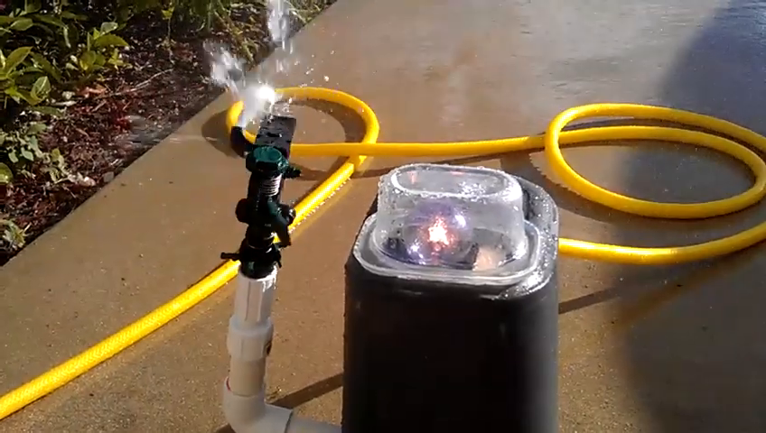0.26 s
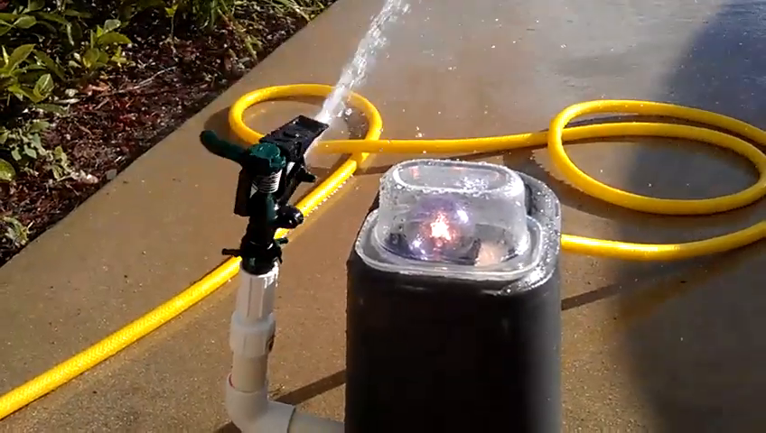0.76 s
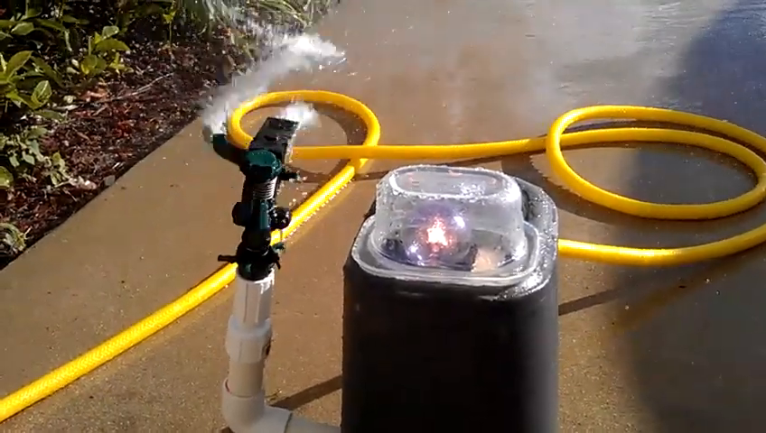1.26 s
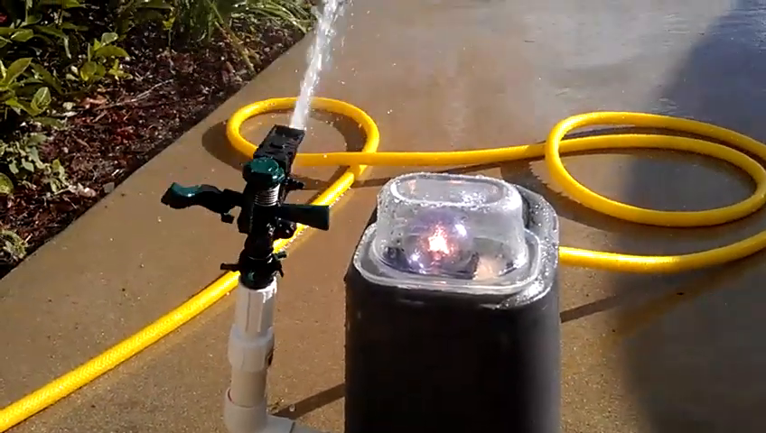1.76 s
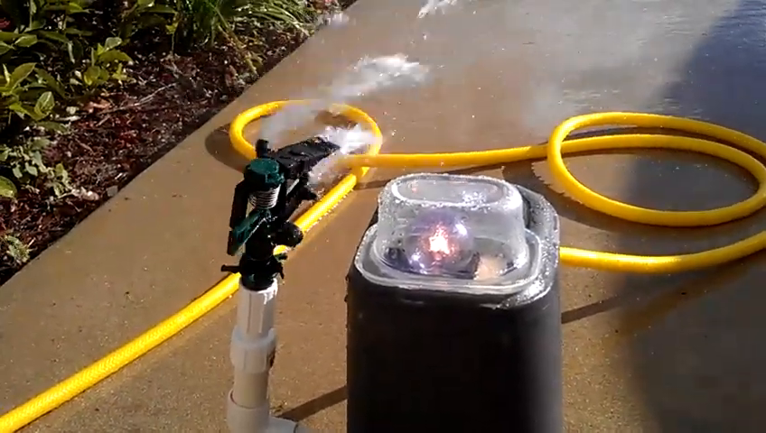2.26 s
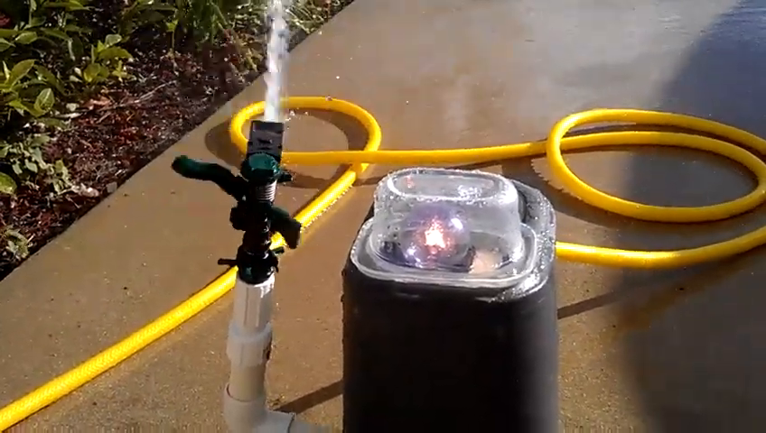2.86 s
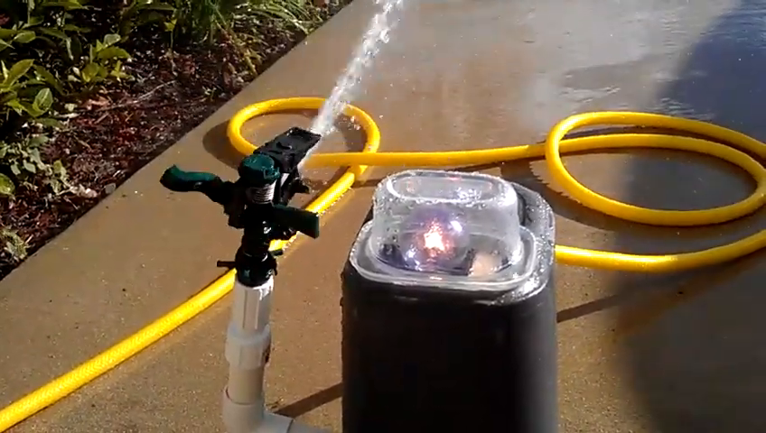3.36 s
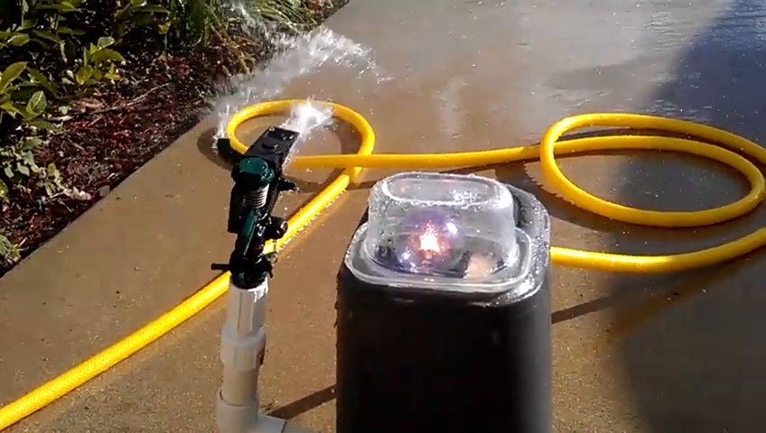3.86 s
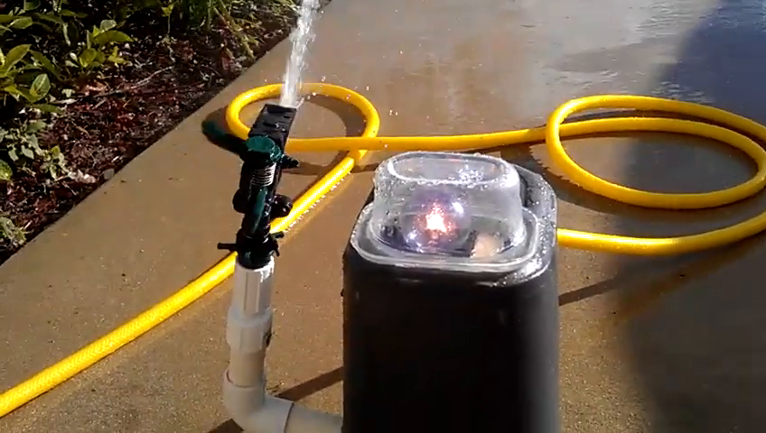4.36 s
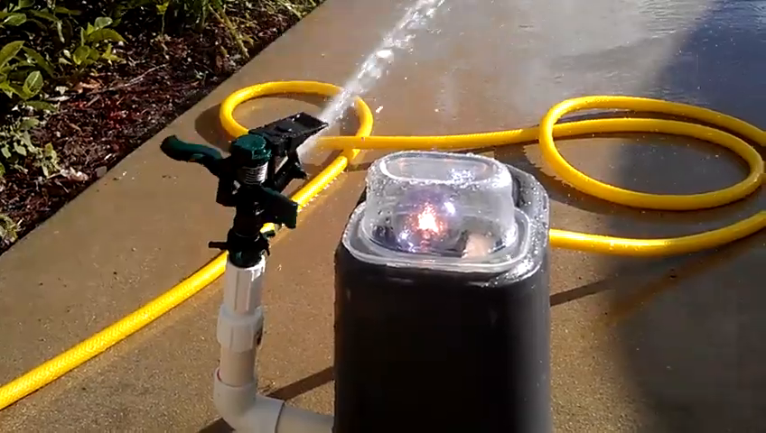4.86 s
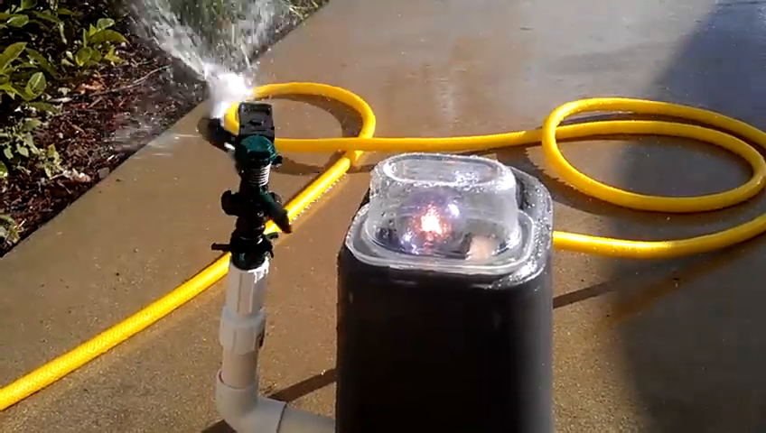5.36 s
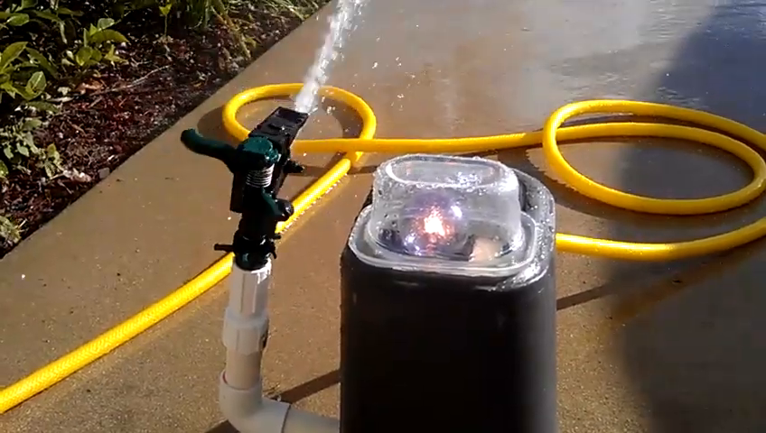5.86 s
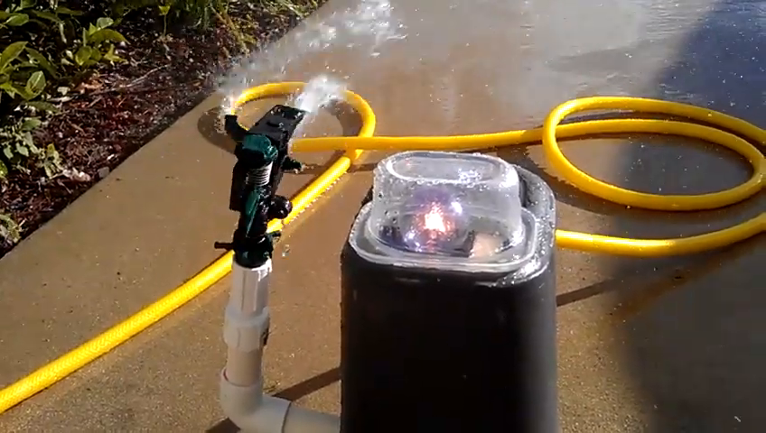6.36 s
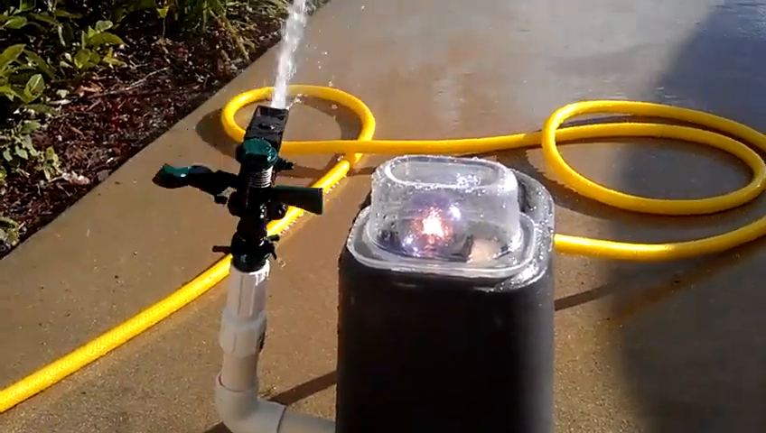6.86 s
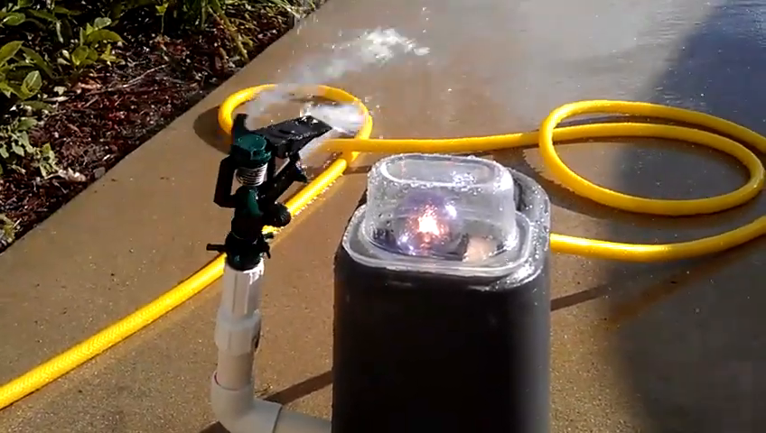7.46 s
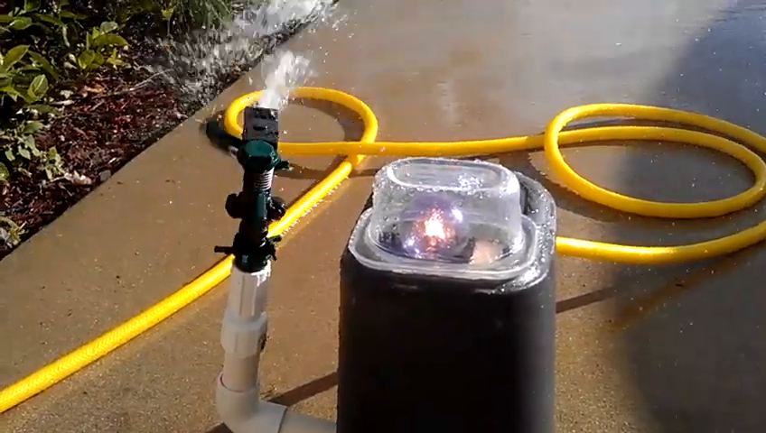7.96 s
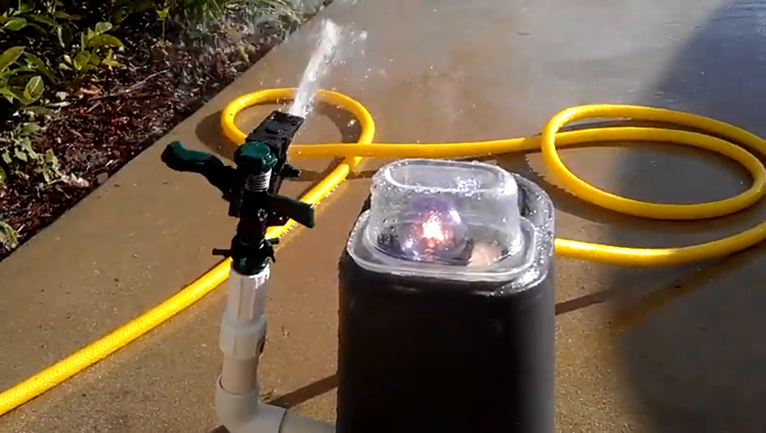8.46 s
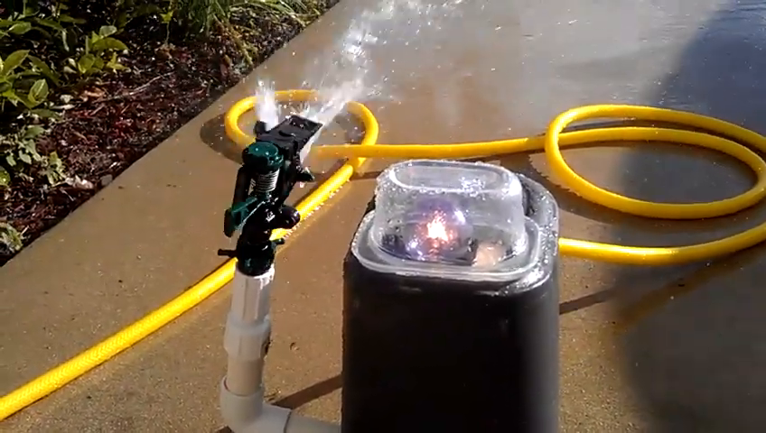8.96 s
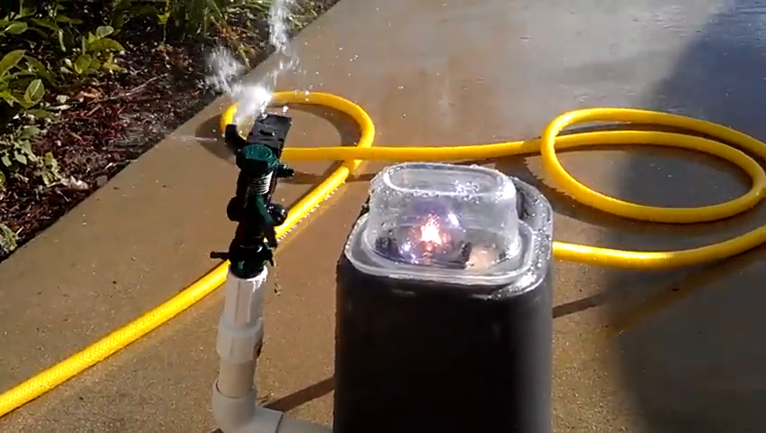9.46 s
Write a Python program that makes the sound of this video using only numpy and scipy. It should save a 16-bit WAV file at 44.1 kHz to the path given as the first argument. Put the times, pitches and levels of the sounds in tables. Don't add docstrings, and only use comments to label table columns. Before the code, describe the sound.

An impact sprinkler very close to a handheld stereo microphone outdoors. Its arm chops through the jet about nine times a second, each slap a hard splashy crack with a dry, hollow plastic knock. Every second or so the even run ends in a softer-edged, longer splash and a fast, buzzing flutter as the head swings back. Water hisses throughout, with light wind thumps, a few puddle plops and slightly overloaded peaks.

```python
import sys
import numpy as np
from scipy import signal
from scipy.fft import rfft, irfft
from scipy.io import wavfile
from scipy.ndimage import uniform_filter1d

SR = 44100
rng = np.random.default_rng(int(sys.argv[2]) if len(sys.argv) > 2 else 0)


def unload_wav(signal):
    wavfile.write(
        sys.argv[1],
        SR,
        np.round(np.clip(np.atleast_2d(signal).T, -1, 1) * 32767).astype(np.int16),
    )


def field_ratio(decibels):
    return 10 ** (np.asarray(decibels, dtype=float) / 20)


N = 428211
FREQ = np.maximum(np.fft.rfftfreq(N, 1 / SR), 1)
TIME = np.arange(N) / SR
SLAP_PERIOD_S, FLUTTER_PERIOD_S = .1064, .035
SWEEP_PAUSE_S = 2 * SLAP_PERIOD_S


def strokes(runs, period_s):
    rows = []
    for first, last, db in runs:
        count = round((last - first) / period_s) + 1
        rows += [(s, db) for s in np.linspace(first, last, count)]
    return np.transpose(rows)


# first slap in seconds, last slap in seconds, splash level in dB.
SLAP_RUNS = [(.221, .650, -6.5), (.748, 1.069, -7), (1.572, 1.892, -8), (1.997, 2.318, -6.5),
             (2.850, 3.702, -7), (4.228, 4.759, -7), (4.864, 4.864, -4.5), (4.972, 4.972, -7),
             (5.531, 5.636, -8.5), (5.737, 6.271, -6.5), (6.763, 7.614, -6.5), (8.174, 8.709, -7),
             (8.814, 8.814, -2.5), (8.921, 8.921, -6), (9.410, 9.622, -7.5)]
# first stroke in seconds, last stroke in seconds, splash level in dB.
FLUTTER_RUNS = [(.015, .120, -6), (1.110, 1.462, -5), (2.359, 2.745, -5.5), (3.744, 4.124, -6),
                (5.010, 5.423, -5.5), (6.308, 6.661, -6), (7.653, 8.077, -6.5), (8.961, 9.312, -6)]


def arm():
    s, db = strokes(SLAP_RUNS, SLAP_PERIOD_S)
    chance = rng.standard_normal((len(s), 3)).T
    first = np.diff(s, prepend=0) > SWEEP_PAUSE_S
    trip = np.diff(s, append=s[-1]) > SWEEP_PAUSE_S
    level_db = db + 0.8 * chance[0] + 2.3 * trip
    knock_db = -10.5 + 1.4 * chance[1] + 0.5 * first
    rise_ms = np.where(trip, 5.5, 2.3 * np.exp(.5 * chance[2]))
    rise_ms[first] = 1.1
    fall_ms = np.where(trip, 13, 10.3 * np.exp(.15 * chance[1]))
    slap = np.array([s, level_db, knock_db, rise_ms, fall_ms])

    s, db = strokes(FLUTTER_RUNS, FLUTTER_PERIOD_S)
    chance = rng.standard_normal((len(s), 3)).T
    jitter_s = 0.00119 * chance[2]
    quick = np.array([s + jitter_s, db + 0.88 * chance[0], -24 + 2.4 * chance[1]])
    return slap, quick


def along(table, hz):
    points = np.array(table)
    return np.interp(np.log(hz), np.log(points[:, 0]), points[:, 1])


def walk(rate):
    k = int(SR / rate)
    held = np.repeat(rng.standard_normal(N // k + 1), k)
    return 1.4 * uniform_filter1d(uniform_filter1d(held, k), k)[:N]


# frequency in Hz, share common to both ports from 0 to 1.
COHERENCE = [(60, 0.42), (300, 0.93), (1200, 0.63), (1700, 0.17), (2600, 0.77), (3300, 0.29), (5500, 0.17),
             (9700, 0.04), (10200, 0.04)]
# frequency in Hz, left minus right in dB.
BALANCE = [(60, 0), (400, 1), (1200, 2), (2700, 1), (3800, 1.5), (4600, 1.5), (5200, 2.5), (6500, 5),
           (7300, 0.5), (7700, 4.5), (8500, -8.5), (10000, 1), (13000, 1)]


def ports(common, own):
    share = np.clip(along(COHERENCE, FREQ), 0, 1)
    right_lag_s = 2.8 / SR
    lag = np.array([np.ones(len(FREQ)), np.exp(-2j * np.pi * FREQ * right_lag_s)])
    side = field_ratio(along(BALANCE, FREQ) * np.array([[.5], [-.5]]))
    return side * (np.sqrt(share) * common * lag + np.sqrt(1 - share) * own)


def water(tone, shape_db, sharpness, shared_db, own_db, flicker_hz):
    noise = rfft(rng.standard_normal((3, N)))
    spectrum = ports(noise[0], noise[1:]) * field_ratio(along(tone, FREQ))
    spectrum /= np.sqrt(2 * np.mean(np.sum(np.abs(spectrum) ** 2, axis=1))) / N
    edges = np.r_[0, 500 * 2 ** np.arange(0, 5.1, .5), SR]
    shared, out = walk(flicker_hz), 0
    for lo, hi in zip(edges, edges[1:]):
        sharp = np.interp(np.log(hi), np.log([1000, 8000, 14000]), sharpness)
        gain = field_ratio(sharp * shape_db + shared_db * shared + own_db * walk(flicker_hz / 3))
        band = (FREQ >= lo) & (FREQ < hi)
        out = out + gain * irfft(spectrum * band, N)
    return out


def bursts(times, levels_db, rise_ms, fall_ms, hold_ms):
    power = np.full(N + 8000, 1e-9)
    ms = np.arange(-2000, 4000) * 1000 / SR
    for s, db, rise, fall in zip(times, levels_db, rise_ms, fall_ms):
        shape_db = np.minimum(5 * ms / rise, 0) - 8 * np.maximum(ms - hold_ms, 0) / fall
        at = 2000 + int(s * SR)
        power[at - 2000:at + 4000] += field_ratio(2 * (db + shape_db))
    return 10 * np.log10(power[2000:N + 2000])


# frequency in Hz, level in dB per Hz.
SLAP_SPECTRUM = [(180, -13.5), (440, -9), (1250, -3.5), (1600, -5.5), (2200, -5), (3100, -8.5), (4400, 1),
                 (4900, -3), (8700, -4.5), (10300, -5.5), (13800, -16.5)]


def slaps(slap):
    s, db, _, rise, _ = slap
    rise = np.clip(.4 * rise, .5, 3)
    times = np.r_[s + .002, s + .013]
    levels_db = np.r_[db + 4.5, db - 1.5]
    shape_db = bursts(times, levels_db, np.r_[rise, rise], np.full(2 * len(s), 9.), hold_ms=3.54)
    return field_ratio(-6.0) * water(SLAP_SPECTRUM, shape_db, [1.2, 1, .8], 2.56, 1., flicker_hz=500)


# frequency in Hz, level in dB per Hz.
SHEET_SPECTRUM = [(300, -37.5), (600, -19.5), (1150, -15), (1500, -22), (2440, -16), (3300, -9.5),
                  (4400, -2), (5000, -4), (6300, 2), (8700, 0), (9700, -4.5), (10400, -11.5),
                  (13800, -27.5)]


def flutter(slap, quick):
    s, db, _, rise, fall = slap
    sheet = bursts(s + 0.0014, db + 12.0, np.clip(0.58 * rise, .8, 6), fall, hold_ms=8.4)
    first = np.diff(s, prepend=0) > SWEEP_PAUSE_S
    nearing = bursts(s, db - .6 - 3 * first, np.full(len(s), 21.), np.full(len(s), 30.), hold_ms=0.)
    s, db, _ = quick
    throb = bursts(s - .004, db + 7.5, np.full(len(s), 5.), np.full(len(s), 8.), hold_ms=12.1)
    shape_db = 10 * np.log10(field_ratio(2 * sheet) + field_ratio(2 * nearing) + field_ratio(2 * throb))
    return field_ratio(-8.5) * water(SHEET_SPECTRUM, shape_db, [1.1, 1, .6], 1.43, 1., flicker_hz=400)


# frequency in Hz, level in dB, decay by 60 dB in seconds.
BODY_MODES = [(210, -10.5, 0.14), (282, -11.5, 0.094), (677, -3.5, 0.05), (840, 1.5, 0.03),
              (1194, 9, 0.014), (2107, 6.5, 0.014), (4500, -7, 0.013)]


def knocks(slap, quick):
    blows = [(s + 0.00499, db + knock) for s, db, knock, *_ in slap.T]
    for s, db, knock in quick.T:
        blows += [(s + .001, db + knock + 3), (s + .017, db + knock + 0.93)]
    hz, mode_db, t60 = np.transpose(BODY_MODES)
    t = np.arange(8192) / SR
    decay = np.exp(-np.log(1000) * t / t60[:, None])
    onset = 1 - np.exp(-t / 0.00064)
    out = np.zeros((3, N + len(t)))
    for s, db in blows:
        chance = rng.standard_normal((3, 2, len(hz), 1))
        level = field_ratio(mode_db[:, None] + 2.93 * chance[:, 0])
        mode_hz = hz[:, None] * (1 + 0.0083 * chance[:, 1])
        rings = decay * level * np.sin(2 * np.pi * mode_hz * t + chance[:, 0])
        at = int((s + .002 * chance[0, 1, 0, 0]) * SR)
        out[:, at:at + len(t)] += field_ratio(db - 1.0) * np.sum(rings, axis=1) * onset
    spectrum = rfft(out[:, :N])
    return irfft(ports(spectrum[0], spectrum[1:]), N)


def riser(quick):
    s, db, _ = quick
    shake_db = bursts(s, db + 2, np.full(len(s), 25.), np.full(len(s), 45.), hold_ms=4.6)
    shake = field_ratio(shake_db + walk(60))
    bending_hz = 209 * (1 + 0.00825 * walk(15))
    turns = np.cumsum(bending_hz) / SR
    return field_ratio(-33.5) * shake * np.sin(2 * np.pi * turns) * field_ratio([[-1.5], [1.5]])


# frequency in Hz, level in dB per Hz.
JET_SPECTRUM = [(24, -67), (40, -52), (178, -15), (428, -25), (618, -16), (733, -21.5), (1080, -20),
                (1380, -22), (1720, -17.5), (3100, -20), (4150, -13.5), (5570, -9), (6140, -3.5),
                (8860, -8.5), (13800, -31.5)]
# delay after the first slap in seconds, level in dB.
JET_RESTART_LEVELS = [
    (-.06, -27.5),
    (-.02, -24),
    (.06, -20.5),
    (.17, -22),
]


def jet(slap):
    s = slap[0]
    pause = np.diff(s) > SWEEP_PAUSE_S
    firsts = np.r_[s[0], s[1:][pause]]
    points = [(first + late, db) for first in firsts for late, db in JET_RESTART_LEVELS]
    points += [(trip - .05, -19.5) for trip in s[:-1][pause]]
    s, db = np.transpose(sorted(points))
    shape_db = np.interp(TIME, s, db + 21) + 0.99 * walk(9)
    return field_ratio(-18.0) * water(JET_SPECTRUM, shape_db, [.9, .9, .7], 0.9, 0.95, flicker_hz=60)


# time in seconds, level in dB, bubble frequency in Hz.
PUDDLE_DROPS = [
    (2.265, -16.5, 2700),
    (3.628, -16, 2600),
    (6.742, -25, 2300),
    (6.772, -12, 2200),
    (8.874, -8.5, 2740),
    (8.908, -18, 2780),
]


def drips():
    t = np.arange(-400, 600) / SR
    out = np.zeros((2, N))
    for s, db, hz in PUDDLE_DROPS:
        at = int(s * SR) - 400
        swell = np.exp(-(t / 0.0032) ** 2)
        out[:, at:at + len(t)] += field_ratio(db) * swell * np.sin(2 * np.pi * hz * t * (1 + 3 * t))
    return out


# time in seconds, level in dB,
# frequency in Hz, left minus right in dB.
STRONG_PUFFS_AND_THUMP = [(.314, -20, 350, -10), (.723, -19, 330, -11), (.78, -18.5, 240, -9), (.395, -7.5, 260, -9),
                          (.476, -15, 211, -8), (.573, -18, 251, -6), (.603, -16, 236, 14), (.626, -13, 245, 11),
                          (0.919, -12.5, 248, 8), (1.631, -14, 240, -17), (1.834, -21, 270, -9),
                          (1.845, -9.5, 350, -10), (1.867, -4.5, 287, -8), (1.979, -14, 280, -13),
                          (2.094, -11, 225, -7), (2.127, -17, 270, -11), (2.142, -10.5, 290, -10),
                          (2.362, -13.5, 280, -17), (2.377, -17, 240, -6), (3.444, -18.5, 250, -9),
                          (4.288, -12.5, 270, -13), (4.311, -8, 250, -8), (5.982, -4.5, 282, -11),
                          (6.021, -10, 328, -9), (6.146, -21, 210, -13), (8.822, -22, 85, 0), (8.855, -24, 209, 0)]
# start in seconds, end in seconds, level in dB.
GUST_SPANS = [
    (.4, .56, -20),
    (1.731, 2.323, -20),
    (5.581, 5.851, -19),
    (6.06, 6.252, -21),
]


def wind():
    t = np.arange(-600, 1400) / SR
    out, gust = np.zeros((2, N)), np.zeros((2, N))
    small = []
    for start, end, db in GUST_SPANS:
        count = int((end - start) * 20)
        for a, b, c, d in rng.random((count, 4)):
            hz, pan_db = 270 * (0.78 + 0.33 * c), -10.5 + 8 * (d - .5)
            small.append((start + (end - start) * a, db + 8 * (b - .5), hz, pan_db))
    for s, db, hz, pan_db in STRONG_PUFFS_AND_THUMP + small:
        at = int(s * SR) - 600
        gain = field_ratio(db + np.minimum([[pan_db], [-pan_db]], 0))
        cycles = t * hz
        bump = np.where(t < 0, np.exp(-(cycles / .25) ** 2), np.exp(-cycles / 1.5))
        phase = rng.uniform(0, 2 * np.pi, (2, 1))
        swing = np.cos(2 * np.pi * cycles * (1 - 8 * t) + phase)
        out[:, at:at + len(t)] += 1.54 * gain * bump * swing
        gust[:, at] += gain[:, 0]
    low_band = signal.butter(2, [150, 450], "band", fs=SR, output="sos")
    rumble = signal.sosfilt(low_band, rng.standard_normal((2, N)))
    rumble *= field_ratio(3 * walk(60))
    swell = uniform_filter1d(uniform_filter1d(gust, 3000), 3000)
    return out + field_ratio(65.5) * swell * rumble


def scene():
    slap, quick = arm()
    spray = slaps(slap) + flutter(slap, quick) + jet(slap)
    solids = knocks(slap, quick) + riser(quick)
    return spray + solids + drips() + wind()


# frequency in Hz, level in dB.
CAPSULE_RESPONSE = [(30, -7.5), (110, 2), (8700, -1), (9700, 2), (10200, -1), (11000, 1), (13500, 3)]
# frequency in Hz, width in Hz, level in dB.
HOUSING_MODES = [(4505, 68, 1.5), (4700, 85, -1), (5880, 71, 3), (6040, 84, -3.5), (6300, 140, 0.9),
                 (7000, 250, 1), (10270, 200, 2.5), (12600, 370, 2), (11300, 280, 2), (11860, 200, 1.5)]


def microphone(dry):
    colour_db = along(CAPSULE_RESPONSE, FREQ)
    for hz, width, db in HOUSING_MODES:
        colour_db = colour_db + db * np.exp(-((FREQ - hz) / width) ** 2)
    return np.clip(irfft(rfft(dry) * field_ratio(colour_db), N), -1.08, 1.08)


# frequency in Hz, threshold in dB re neighbouring lines.
GATE_THRESHOLD = [(2200, -9), (3200, 0), (4000, -.5), (5300, -1), (6000, -3.5), (9600, -3.5), (10200, .5)]


def spectral_gate(heard):
    hz, _, lines = signal.stft(heard, SR, "cosine", 2048, 1024)
    power = np.mean(np.abs(lines) ** 2, axis=0) + 1e-20
    near = uniform_filter1d(power, size=7, axis=0)
    wide = uniform_filter1d(power, size=41, axis=0)
    threshold = field_ratio(2 * along(GATE_THRESHOLD, hz + 1))[:, None]
    keep = np.clip(near / wide / threshold, 0, 1) ** 8
    passed = uniform_filter1d(power * keep ** 2 + 1e-20, size=41, axis=0)
    gain = keep * np.sqrt(wide / passed)
    return signal.istft(lines * gain, SR, "cosine", 2048, 1024)[1][:, :N]


def top_cut(x):
    return signal.sosfilt(signal.butter(12, 13910, fs=SR, output="sos"), x)


def record(dry):
    mix = spectral_gate(microphone(dry))
    return top_cut(mix)


dry = scene()
out = record(dry)
unload_wav(out)
```